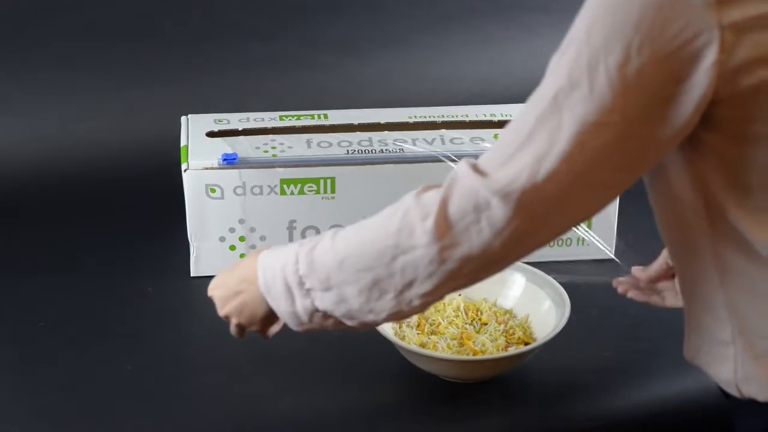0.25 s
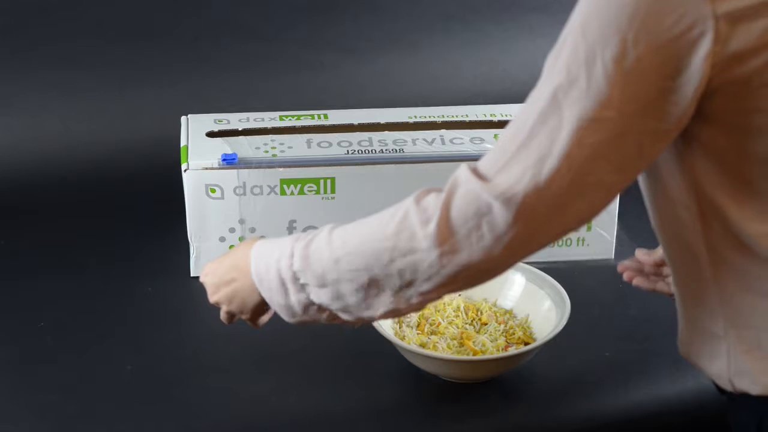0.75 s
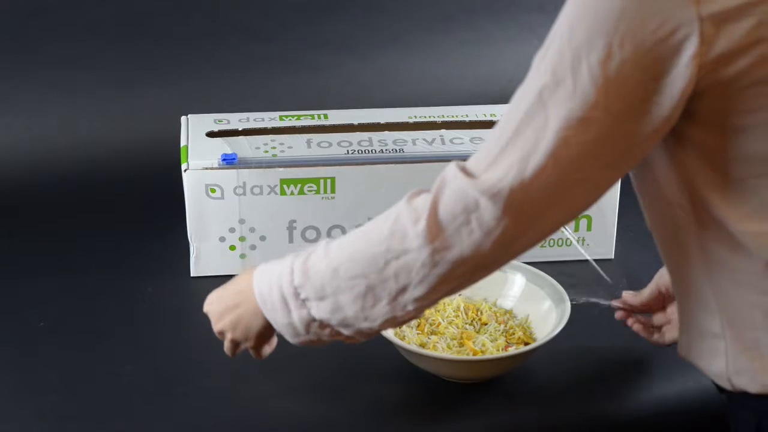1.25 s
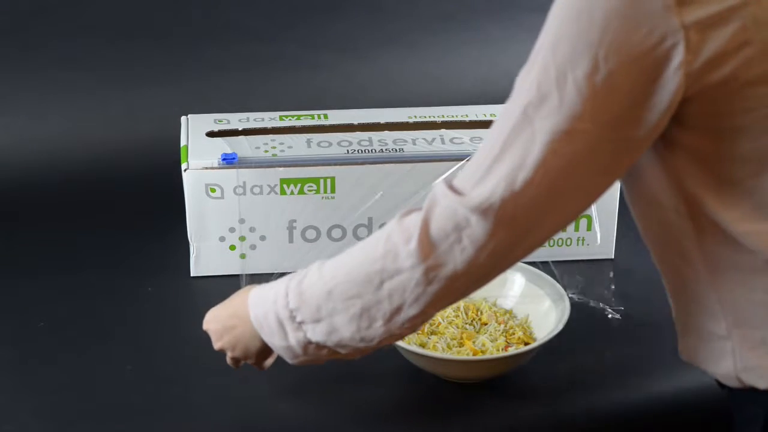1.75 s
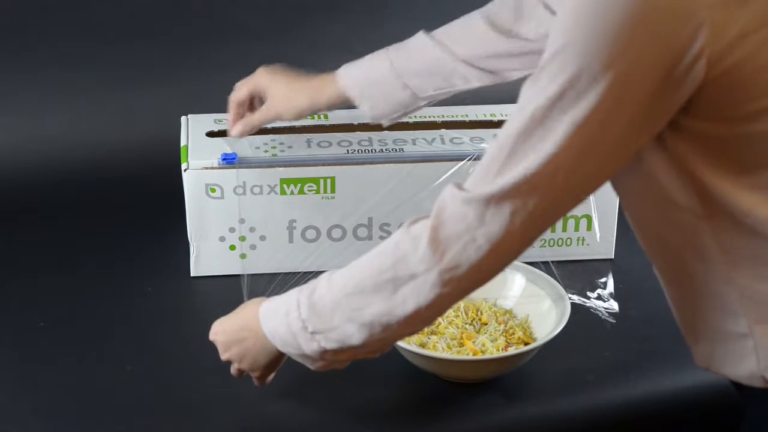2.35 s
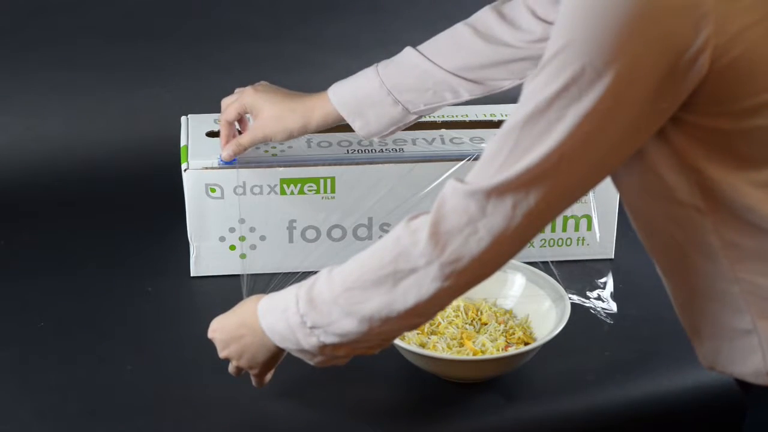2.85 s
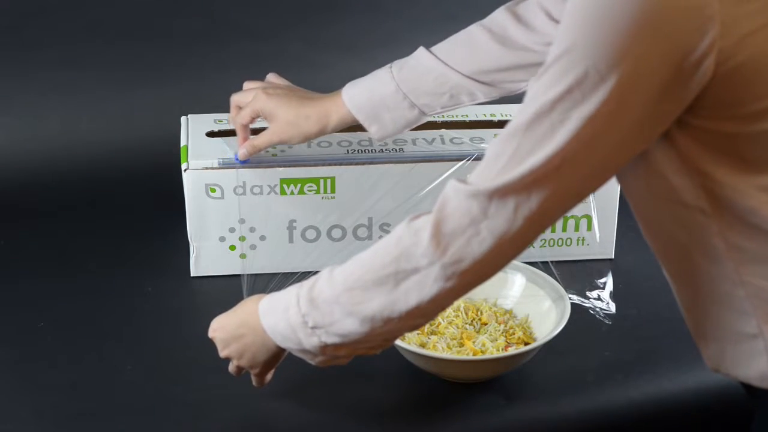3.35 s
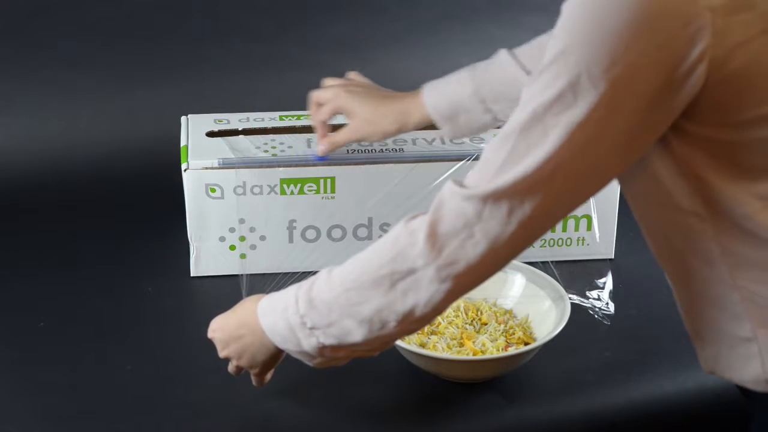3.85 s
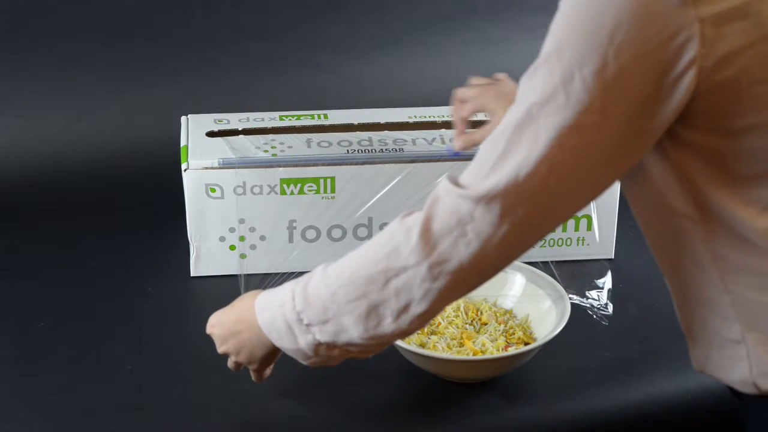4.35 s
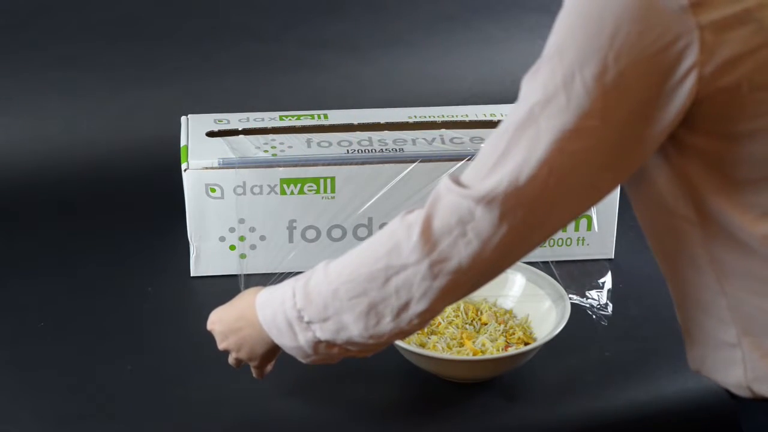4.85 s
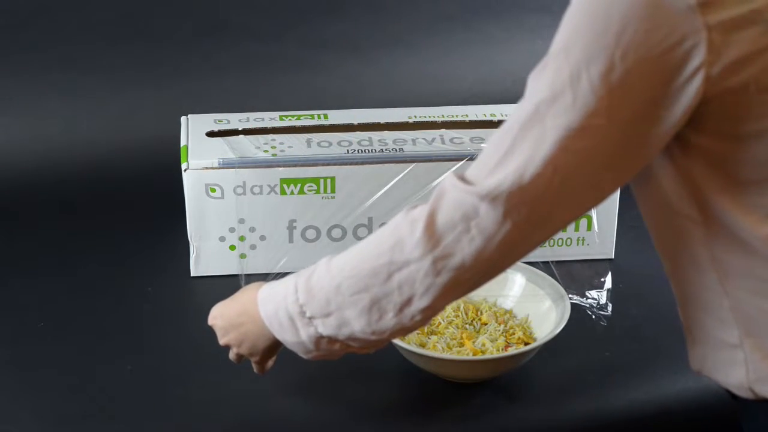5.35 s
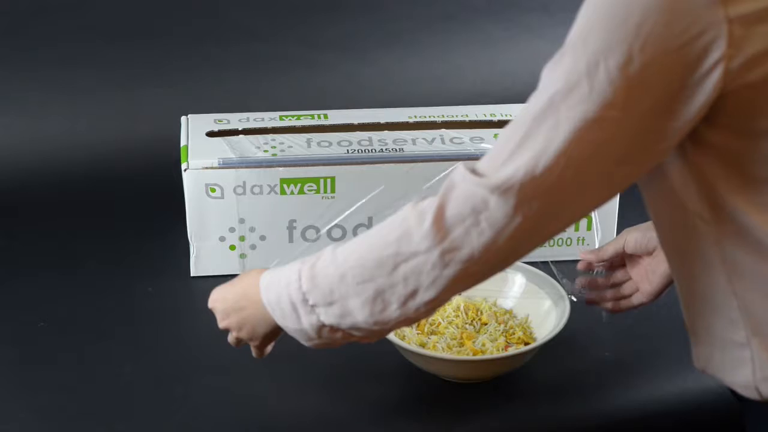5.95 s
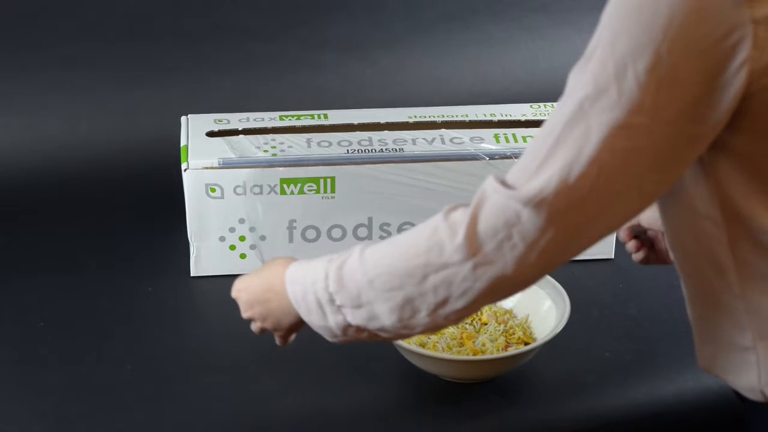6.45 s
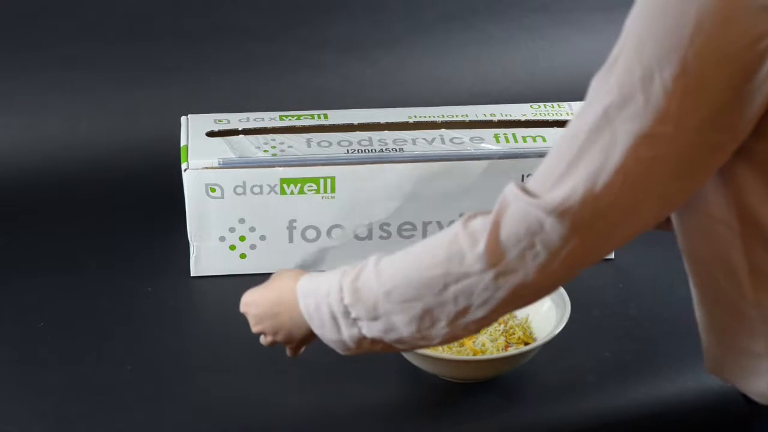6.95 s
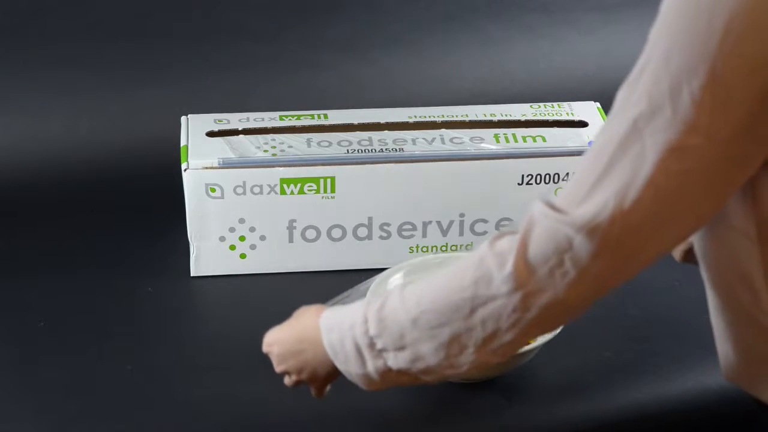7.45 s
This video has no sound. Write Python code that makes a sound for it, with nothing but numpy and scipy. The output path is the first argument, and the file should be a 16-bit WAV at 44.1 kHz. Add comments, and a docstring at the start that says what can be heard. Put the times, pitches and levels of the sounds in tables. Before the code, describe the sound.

Crisp snaps of stretched cling film, light box knocks and a soft cutter slide, ending in a flurry of crackles over low ventilation.

```python
"""Cling film crackles as it is drawn from a cardboard box over a bowl, cut and pulled free.
Each crease flips with a snap and shakes the tight sheet like a drum. A sliding cutter hisses
along its track and snags the film, the box takes a few knocks, and sleeves brush softly.
The snaps bounce off a table top and echo in a small room, over a low ventilation rumble."""
import sys
import numpy as np
from scipy import signal
from scipy.fft import rfft, irfft, next_fast_len
from scipy.io import wavfile
from scipy.ndimage import map_coordinates

SR = 44100
rng = np.random.default_rng(int(sys.argv[2]) if len(sys.argv) > 2 else 0)


def wrap_up_sound(samples):
    """Save the sound to the file named by the first command line argument, as 16-bit audio."""
    columns = np.atleast_2d(samples).T
    # keep every value between -1 and 1, then stretch to whole-number steps
    tamed = np.clip(columns, -1, 1)
    steps = np.round(tamed * 32767).astype(np.int16)
    wavfile.write(sys.argv[1], SR, steps)


N = 339129
TIME = np.arange(N) / SR
SHORT = 16384  # samples in one short sound; AGE holds its times and HZ its frequencies
AGE = np.arange(SHORT) / SR
HZ = np.fft.rfftfreq(SHORT, 1 / SR)


def amp(db):
    """Turn decibels into a gain."""
    return 10 ** (np.asarray(db) / 20)


def unit(x):
    """Scale x to an average (rms) level of 1."""
    return x / np.sqrt(np.mean(x ** 2) + 1e-20)


def unit_start(x, seconds):
    """Scale x so that its first moments have an rms level of 1."""
    return x / np.sqrt(np.mean(x[:int(seconds * SR)] ** 2))


def along(points, hz):
    """Read between the (frequency, value) rows of a table, on a log frequency scale."""
    freqs, values = np.transpose(points)
    return np.interp(np.log(hz + 1), np.log(freqs + 1), values)


def hump(hz, octaves):
    """A bell curve of height 1 around hz."""
    return np.exp(-.5 * (np.log2((HZ + 1) / hz) / octaves) ** 2)


def peaks(rings, lift_db=0):
    """The boost in dB around each frequency at which an object rings."""
    boost = sum(amp(db + lift_db) / (1 + (2 * (HZ - hz) / width) ** 2) for hz, width, db in rings)
    return 20 * np.log10(1 + boost)


def fade(t60, t=AGE):
    """A fade that falls by 60 dB in t60 seconds."""
    return np.exp(-np.log(1000) * t / t60)


def burst(t60):
    """A puff of dying noise with energy 1."""
    noise = rng.standard_normal(SHORT) * fade(t60)
    return noise / np.linalg.norm(noise)


def wobble(rate):
    """A smooth curve through `rate` random values a second."""
    values = rng.standard_normal(int(N * rate / SR) + 4)
    return map_coordinates(values, [np.arange(N) * rate / SR])


def filtered(x, gain_at):
    """Give each frequency of a long sound its own gain."""
    size = next_fast_len(N + SR // 2)
    return irfft(rfft(x, size) * gain_at(np.fft.rfftfreq(size, 1 / SR)), size)[:N]


def coloured(x, db):
    """Shape the tone of a short sound with one dB value per frequency."""
    cepstrum = irfft(np.log(amp(db) + 1e-6))
    # fold it so the filter rings after a hit, not before
    cepstrum[1:SHORT // 2] *= 2
    cepstrum[SHORT // 2 + 1:] = 0
    return irfft(rfft(x) * np.exp(rfft(cepstrum)))


def add(track, t, x):
    """Mix x into the track from t seconds on."""
    start = max(round(t * SR), 0)
    track[start:start + len(x)] += x[:max(N - start, 0)]


def stroke(moves, power):
    """Rubbing gets louder as each move speeds up and softer as it slows down."""
    energy = 0
    for t, rise, fall, db in moves:
        speed = np.interp(TIME, [t - rise, t, t + fall], [0, 1, 0])
        energy += amp(db) ** 2 * speed ** power
    return np.sqrt(energy)


# Tone of the moving air: f/Hz, level/dB
AIR_TONE = [(20, -8), (38, -17.5), (70, 0), (100, -7), (200, -8), (500, -17.5), (1030, -20.5),
            (1500, -23.5), (4400, -30.5), (7100, -31.5), (16000, -36)]
# Humming notes of the ventilation: f/Hz, level/dB
HUM_NOTES = [(70.0, -63.5), (199.2, -63.5)]

def ventilation(air_db=-50.5, hum_db=-2, waver_db=5.0, drift_radians=0.97):
    """Ventilation rumbles and hisses steadily, with two low, wavering notes."""
    air = unit(filtered(rng.standard_normal(N), lambda hz: amp(along(AIR_TONE, hz))))
    hum = np.zeros(N)
    for hz, db in HUM_NOTES:
        loudness = amp(db + hum_db + waver_db * wobble(7.8))
        hum += loudness * np.sin(2 * np.pi * hz * TIME + drift_radians * wobble(14))
    return amp(air_db) * air + hum


# How long the room rings: f/Hz, time to fade by 60 dB/s
ROOM_FADE = [(200, 0.41), (1000, 0.2), (4000, 0.26), (9000, 0.23), (15000, 0.087)]

def room_echo(build_s=0.0018):
    """A fresh wash of echoes from the room, with energy 1; the highest tones die first."""
    hz, t, spectrum = signal.stft(rng.standard_normal(SHORT), SR, nperseg=256)
    spectrum *= fade(along(ROOM_FADE, hz)[:, None], t)
    echo = signal.istft(spectrum, SR)[1][:SHORT] * (1 - np.exp(-AGE / build_s))
    return echo / np.linalg.norm(echo)


# Tone of a sleeve and loose film being brushed: f/Hz, level/dB
SLEEVE_TONE = [(300, 2), (1000, 3.5), (2500, 1.5), (5000, -2.5), (7000, -1), (9000, 2), (11500, -5.5),
               (15500, -19)]
# Arm moves: fastest at t/s, speeding up/s, slowing down/s, level/dB
ARM_MOVES = [(0.02, 0.1, 0.57, -63), (0.8, 0.27, 0.25, -65), (1.86, 0.4, 0.36, -56.5),
             (2.33, 0.18, 0.13, -58), (2.8, 0.44, 0.49, -59), (3.7, 0.84, 1.1, -62.5),
             (7.07, 0.49, 0.19, -53), (7.6, 0.061, 0.11, -57.5)]

def brushing(level_db=2, unsteady_db=1):
    """A sleeve and the loose film swish softly as the arms move."""
    cloth = unit(filtered(rng.standard_normal(N), lambda hz: amp(along(SLEEVE_TONE, hz))))
    return stroke(ARM_MOVES, power=1.4) * amp(level_db + unsteady_db * wobble(25)) * cloth


# Tone of the rubbing blade: f/Hz, level/dB
BLADE_TONE = [(300, 2), (1000, -1), (2300, -12), (3700, 0.5), (4900, 0), (6000, 1.5), (9000, -0.5),
              (10000, -1), (11500, -2), (15500, -19)]
# A long push of the cutter, then a nudge: fastest at t/s, speeding up/s, slowing down/s, level/dB
CUTTER_PUSHES = [(4.12, 0.72, 0.84, -52), (5.16, 0.2, 0.1, -60)]

def cutter_slide(level_db=2, slips_per_s=150, slip_db=3, ring_db=11, lowest_hz=6000, range_hz=3700):
    """The blade parts the film in tiny slips, each with its own pitch, over a smooth rub."""
    first, last = CUTTER_PUSHES[0], CUTTER_PUSHES[-1]
    start, end = first[0] - first[1], last[0] + last[2]
    moving = slice(int(start * SR), int(end * SR))
    slips = np.zeros(N)
    for when, pitch, chance in rng.random((int(slips_per_s * (end - start)), 3)):
        slip = coloured(burst(t60=0.032), ring_db * hump(lowest_hz + range_hz * pitch, octaves=0.2))
        size_db = 3 * min(-np.log(chance), 3)  # many small slips, a few big ones
        add(slips, start + when * (end - start), amp(size_db) * slip)
    slips = signal.fftconvolve(slips, signal.unit_impulse(SHORT) + 0.66 * room_echo())[:N]
    rub = rng.standard_normal(N) + amp(slip_db) * slips / np.std(slips[moving])
    hiss = filtered(rub, lambda hz: amp(along(BLADE_TONE, hz)))
    return amp(level_db) * stroke(CUTTER_PUSHES, power=1.76) * hiss / np.std(hiss[moving])


# Overall tone of the cardboard box: f/Hz, level/dB
BOX_TONE = [(120, -25), (400, -2), (900, 2), (1500, 0), (2200, -6.5), (3800, -3), (5000, -14), (7000, -7.5),
            (10000, -14), (15000, -30)]
# Where the box rings: f/Hz, width/Hz, level/dB
BOX_RINGS = [(530, 21, 5.5), (800, 11, 7), (1209, 17, 3.5), (1412, 22, 3), (1815, 36, 4), (2235, 99, -0.5),
             (2410, 32, -9), (3060, 190, -6), (3550, 81, 1), (3570, 36, -23)]
# Knocks on the box, and two low ringing thuds of the stretched film:
# t/s, level/dB, ring f/Hz, ring boost/dB, swell time/s
KNOCKS_AND_THUDS = [(0.004, -41, 440, 17, 0.0028), (0.082, -39.5, 516, 16, 0.0047),
                    (1.231, -44, 1190, 4, 0.0008), (2.586, -41.5, 920, 7, 0.0036),
                    (2.68, -43, 3600, 5, 0.0035), (2.734, -41, 850, 2, 0.009),
                    (2.8027, -29.5, 3700, 12, 0.0016), (2.815, -33, 1500, 0.5, 0.005),
                    (3.442, -42, 610, 14, 0.0042), (3.655, -39.5, 435, 33, 0.0044),
                    (3.668, -39, 950, 34, 0.0037), (4.223, -35, 960, 7, 0.00044),
                    (5.283, -44.5, 1300, 4, 0.0039), (5.2998, -30, 2950, 11, 0.00048),
                    (5.308, -38, 800, 2, 0.0043), (5.467, -41.5, 1300, 8, 0.015),
                    (5.481, -32, 1800, 6.5, 0.003), (5.494, -33.5, 1000, 4.5, 0.011)]

def knocks_and_thuds(level_db=-8, room_db=-8, panel_hz=950, panel_t60=0.082, hard_s=0.00048):
    """Box knocks and film thuds ring briefly: a hard one ticks, a soft one swells and sounds dull."""
    out = np.zeros(N)
    box_db = along(BOX_TONE, HZ) + peaks(BOX_RINGS, lift_db=2)
    for t, db, hz, ring_db, swell_s in KNOCKS_AND_THUDS:
        t60 = panel_t60 * min(panel_hz / hz, 1) ** 0.83  # high rings die sooner
        hit = burst(t60) * (1 - np.exp(-AGE / swell_s))
        hit = hit / np.linalg.norm(hit) + amp(room_db) * room_echo()
        dull_db = -1500 * swell_s / (1 + (3300 / (HZ + 1)) ** 4)  # turns down the treble
        ringing = coloured(hit, box_db + dull_db + ring_db * hump(hz, octaves=0.35))
        tick = 0.69 * np.exp(-(swell_s / hard_s) ** 2) * crack(0, crisp=0.43)
        add(out, t, amp(db + level_db) * unit_start(ringing, 0.014))
        add(out, t + swell_s, amp(db + level_db) * tick)
    return out


# Overall tone of the shaken sheet: f/Hz, level/dB
SHEET_TONE = [(80, -12), (200, -6), (280, -2), (420, -2.5), (600, -0.5), (880, 1), (1200, -3),
              (1600, -11.5), (2400, -12), (5000, -55)]
# Where the sheet rings on its box: f/Hz, width/Hz, level/dB
SHEET_RINGS = [(356, 18.5, -2), (529, 16, 1), (808, 9.1, -9), (1024, 50, -16), (1177, 10, -35),
               (1640, 60, -3), (1840, 39, -3)]

def sheet_drum(bass_db, t60=0.031, swell_s=0.0041, room_db=-1, bass_hz=600):
    """The stretched sheet and its box sound like a slack drum."""
    thump = burst(t60) * (1 - np.exp(-AGE / swell_s)) + amp(room_db) * room_echo()
    low_end_db = bass_db / (1 + (HZ / bass_hz) ** 4)
    tone_db = along(SHEET_TONE, HZ) + low_end_db + peaks(SHEET_RINGS, lift_db=7)
    return unit_start(coloured(thump, tone_db), 0.033)


# Tone of a cracking crease: f/Hz, level/dB
CRACK_TONE = [(200, -34), (900, -18), (2200, 1), (4000, 2.5), (7000, 0), (9500, -1.5), (12000, -5),
              (15500, -12.5)]
# The narrow ring of the cutter's rail: f/Hz, width/Hz, level/dB
RAIL_RING = [(3380, 8.1, 1)]

def crack(colour_db, crisp, swell_s=0.0022, spike_db=3, table_db=-5, room_db=-2):
    """A crisp crease flips with a spike, a slack one with a flutter; table and room echo it."""
    spike = amp(spike_db) * (signal.unit_impulse(SHORT) + burst(t60=0.0092))
    flutter = 1.93 * burst(t60=0.028) * (1 - np.exp(-AGE / swell_s))
    direct = crisp * spike + (1 - 0.49 * crisp) * flutter
    table_bounce = np.roll(direct, int(SR * rng.uniform(.003, .0043)))
    heard = direct + amp(table_db) * table_bounce + amp(room_db) * room_echo()
    tone_db = along(CRACK_TONE, HZ) + colour_db + peaks(RAIL_RING)
    return unit_start(coloured(heard, tone_db), 0.0085)


# The film as it is drawn, cut and freed: t/s, drum level/dB, drum bass/dB, crack f/Hz
FILM_STATES = [(0.34, -11, -2.5, 6700), (0.43, -6.5, -3, 6700), (0.62, -1.5, -6, 7000),
               (1.5, -5.5, -1, 8250), (3.65, -10, 2, 7450), (5.2, -19, -7, 7000), (6.4, -11.5, -6.5, 8900),
               (6.85, -9, -4.5, 8400), (7.1, -8, -6.5, 7600)]

def crease(t, bright_db, crisp, loose_db, drum_db=-1, pivot_hz=8500, thin_hz=3000, usual_db=-7):
    """One crease cracks and shakes the sheet; a looser one drums less and sounds thinner."""
    times, *columns = np.transpose(FILM_STATES)
    tight_db, bass_db, crack_hz = (np.interp(t, times, column) for column in columns)
    sheet_db = tight_db + loose_db
    tilt_db = bright_db * np.tanh(2 * np.log2((HZ + 1) / pivot_hz))
    pitch_db = 4 * hump(crack_hz, octaves=0.28)
    thin_db = 0.86 * min(sheet_db - usual_db, 0) / (1 + (HZ / thin_hz) ** 6)
    return crack(tilt_db + pitch_db + thin_db, crisp) + amp(sheet_db + drum_db) * sheet_drum(bass_db)


# The hands shifting their grip: start t/s, length/s, level/dB
GRIP_SHIFTS = [(0.01, 0.28, -50.5), (1.114, 0.06, -54.5), (1.548, 0.12, -54.5), (5.685, 0.03, -54),
               (7.318, 0.033, -55)]

def finger_ticks(ticks_per_s=16, spread_db=3.5):
    """Small creases flip at uneven moments under the fingers."""
    out = np.zeros(N)
    for start, length, db in GRIP_SHIFTS:
        count = max(round(length * ticks_per_s), 1)
        for k in range(count):
            t = start + length * (k + rng.random()) / count
            gain = amp(db + spread_db * rng.standard_normal())
            add(out, t, gain * crease(t, bright_db=4, crisp=0.47, loose_db=-2))
    return out


# The cutter catching in the film: t/s, level/dB
SNAGS = [(3.123, -45.5), (3.15, -48), (3.327, -50), (3.484, -46.5), (3.575, -44), (3.59, -42),
         (4.451, -49.5), (4.585, -42.5), (5.134, -46)]

def cutter_snags(first_bright_db=6, duller_db_per_s=4):
    """The blade snags film that the rail holds still: thin ticks, duller as the cutter moves away."""
    out = np.zeros(N)
    for t, db in SNAGS:
        bright_db = first_bright_db - duller_db_per_s * (t - SNAGS[0][0])
        add(out, t, amp(db) * crease(t, bright_db, crisp=0.34, loose_db=-18))
    return out


# Creases snapping in the film: t/s, level/dB, brightness/dB, crispness from 0 to 1
FILM_SNAPS = [(0.33, -36, 2, 0.2), (0.3412, -33, 0, 0.72), (0.412, -37.5, 2, 0.16), (0.4238, -28, 3, 0.16),
              (0.4279, -27, 0.5, 0.68), (0.438, -36.5, 4, 0.8), (0.62, -40, 4.5, 0.4),
              (1.48, -45.5, 3, 0.1), (1.4989, -33.5, 3.5, 0.62), (3.641, -41, 8, 0.3), (3.657, -39, 6, 0.3),
              (6.079, -45.5, 2, 0.1), (6.083, -41, 3, 0.56), (6.3366, -46, 7.5, 0.6),
              (6.388, -33.5, 1, 0.4), (6.415, -30.5, 3.5, 0.2), (6.4409, -32.5, 2.5, 0.46),
              (6.457, -36, 2, 0.3), (6.4996, -32.5, 5.5, 0.85), (6.532, -33.5, 8, 0.91),
              (6.561, -42, 6, 0.15), (6.658, -49, 9, 0), (6.667, -39, -2, 0.65), (6.71, -43.5, 5, 0.5),
              (6.799, -46.5, 2, 0.5), (6.8193, -25, 0.5, 0.3), (6.833, -29.5, 2.5, 0.6),
              (6.848, -31, 5, 0.4), (6.873, -34, 4, 0.5), (6.8809, -29.5, 3, 0.44), (6.915, -30, 1.5, 0.4),
              (6.9497, -35, 1.5, 0.43), (7.0196, -41, 1, 0.1), (7.04, -42.5, 1.5, 0.4),
              (7.108, -46.5, -19, 0.1), (7.13, -39, -2.5, 0.25), (7.178, -45.5, 3.5, 0.15),
              (7.6768, -43, 3.5, 0.3)]

def film_snaps(free_db=-17):
    """The loud snaps; the crispest creases flip free of the tight sheet and hardly shake it."""
    out = np.zeros(N)
    for t, db, bright_db, crisp in FILM_SNAPS:
        add(out, t, amp(db) * crease(t, bright_db, crisp, loose_db=free_db * crisp ** 6))
    return out


def film_crinkle(count=4, wait_s=0.018, level_db=-17, spread_db=3):
    """Each snap sets off a few tiny creases nearby, just after it."""
    clicks = np.zeros(N)
    for t, db, *_ in FILM_SNAPS:
        waits = wait_s * rng.uniform(.2, 2, count)
        gains = amp(db + level_db + spread_db * rng.standard_normal(count))
        signs = rng.choice([-1, 1], count)
        for wait, click in zip(waits, signs * gains):
            add(clicks, t + wait, np.array([click]))
    tick = coloured(signal.unit_impulse(SHORT) + .5 * room_echo(), along(CRACK_TONE, HZ))
    return signal.fftconvolve(clicks, unit_start(tick, 0.0029))[:N]


def scene():
    """Film, cutter, box, sleeves and ventilation, mixed into one channel."""
    film = film_snaps() + film_crinkle() + finger_ticks() + cutter_snags()
    return (film + knocks_and_thuds() + cutter_slide() + brushing() + ventilation())[None]


def record(dry, top_hz=15900):
    """Cut away the very highest treble, above top_hz."""
    return filtered(dry[0], lambda hz: hz < top_hz)[None]


dry = scene()
out = record(dry)
wrap_up_sound(out)
```